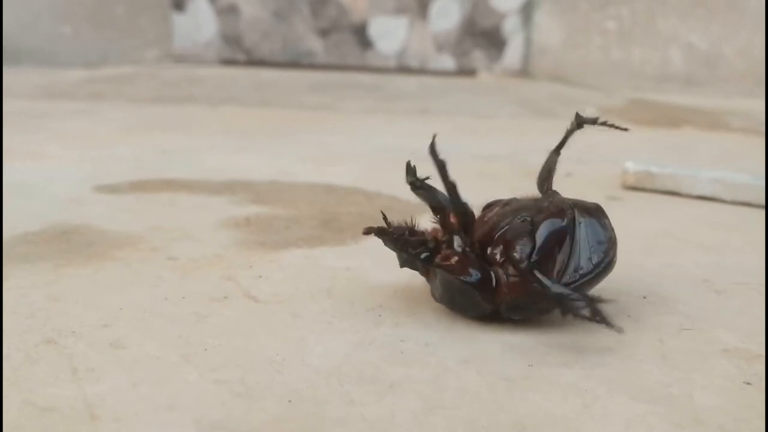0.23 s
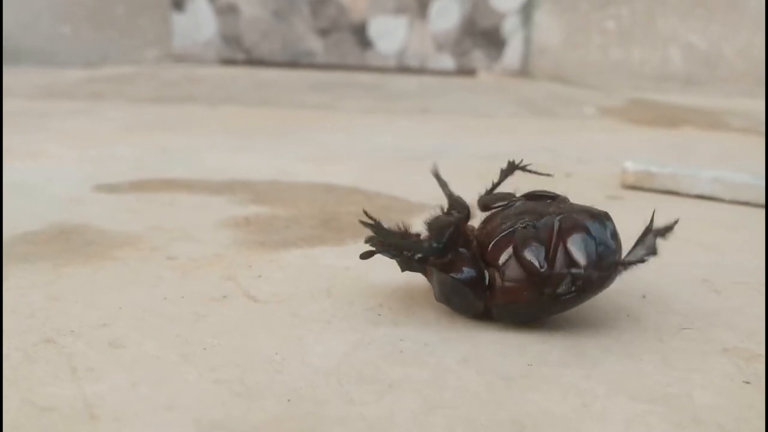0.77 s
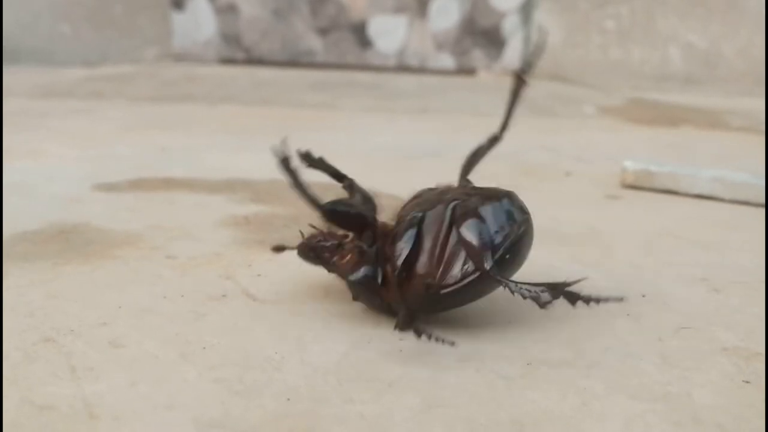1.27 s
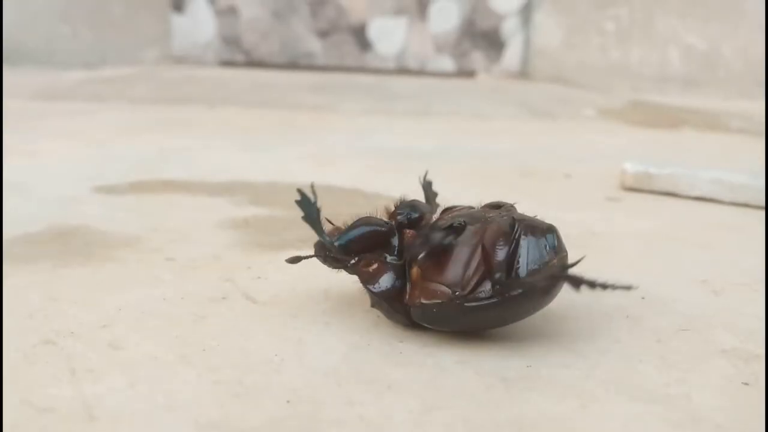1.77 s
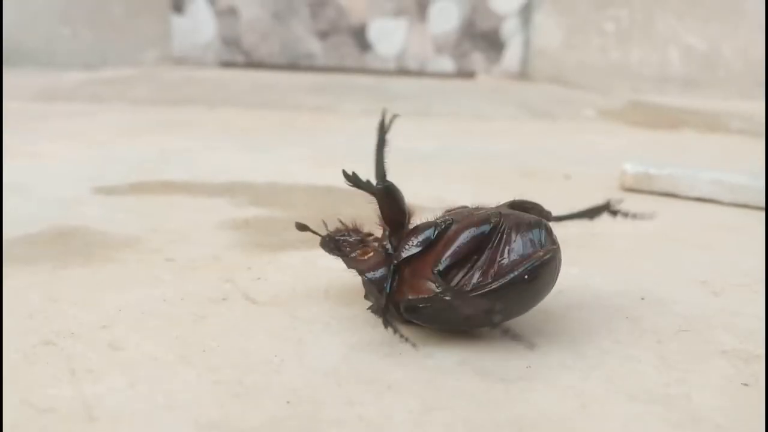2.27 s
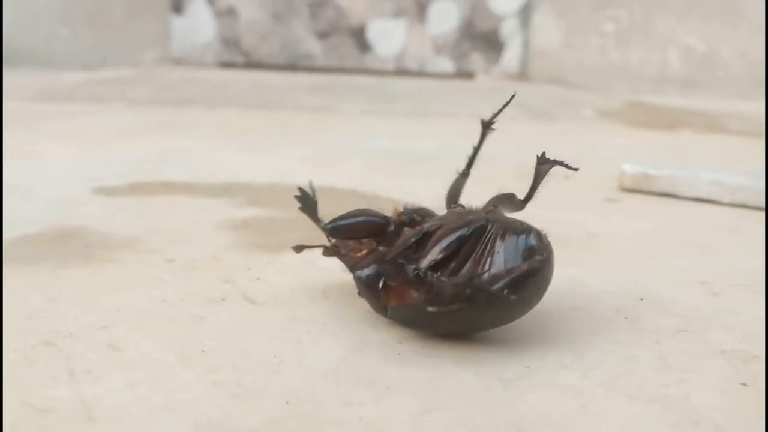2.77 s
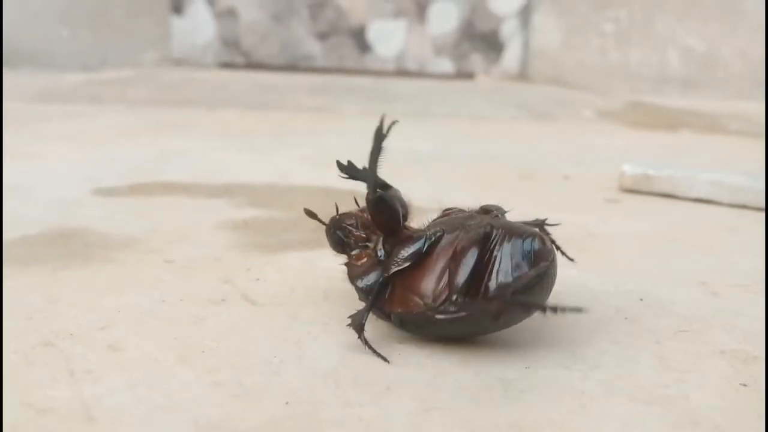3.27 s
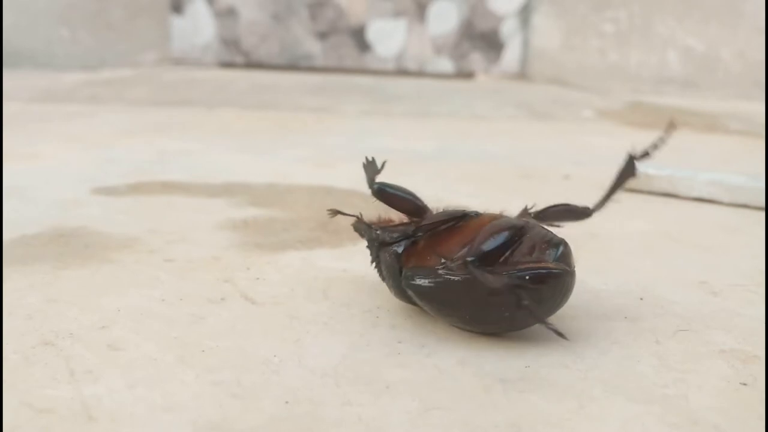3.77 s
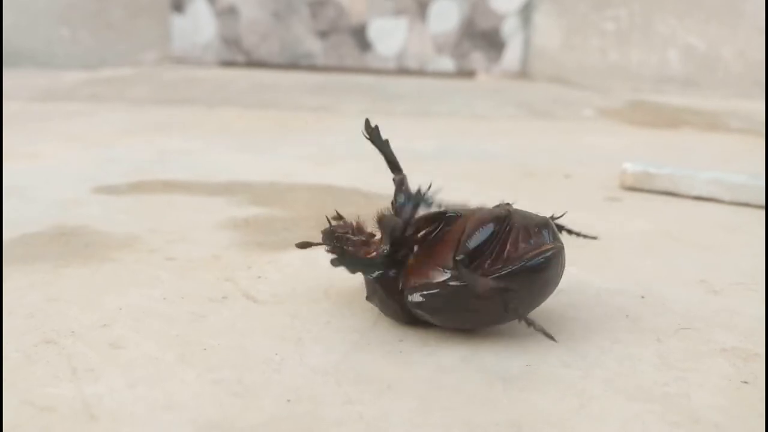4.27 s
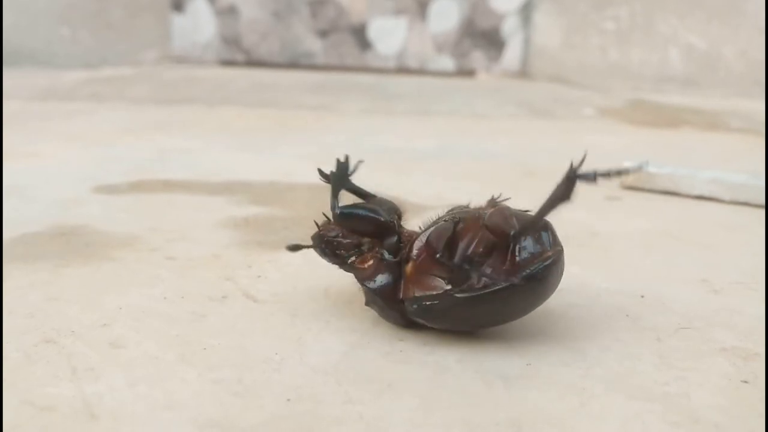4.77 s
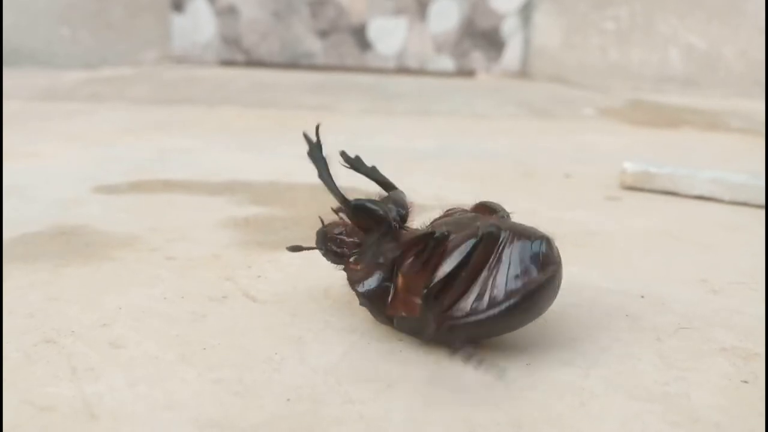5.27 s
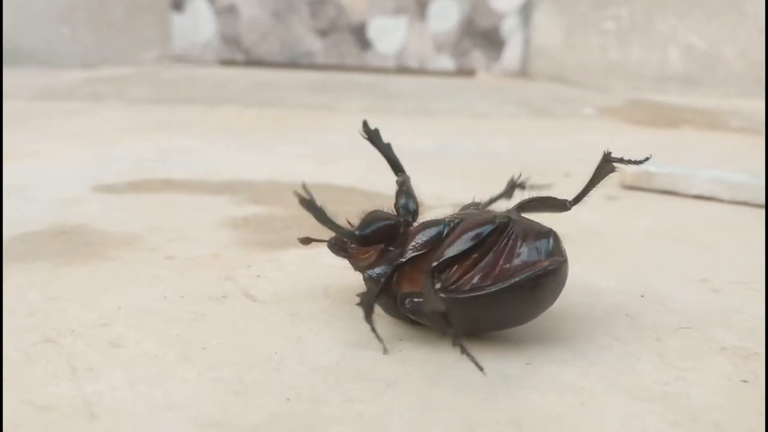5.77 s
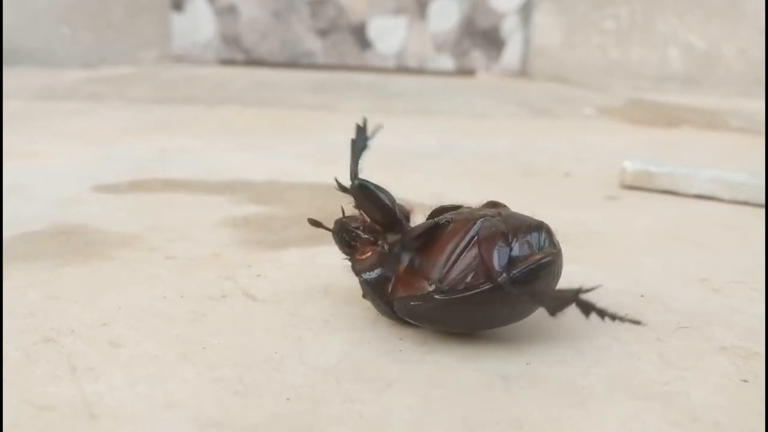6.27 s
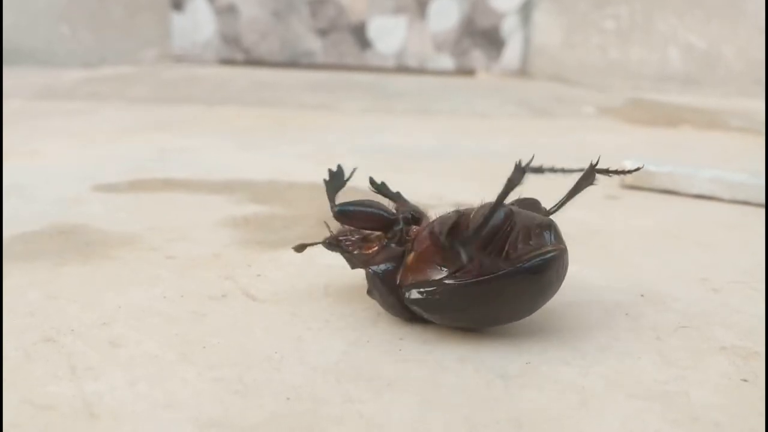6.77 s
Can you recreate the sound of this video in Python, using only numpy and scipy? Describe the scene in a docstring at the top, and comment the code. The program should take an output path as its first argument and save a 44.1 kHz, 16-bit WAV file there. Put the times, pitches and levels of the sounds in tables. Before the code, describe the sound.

A big beetle lying on its back makes a near-continuous dry rasping. It opens with hissy strokes, then alternates grainy, ticking drags with quick zipping sweeps roughly once a second. Early on it rolls slightly and the tone shifts a little. Odd sharp snaps mark changes of stroke; a faint hum and a brief thin squeak barely show. Close stereo pickup, hard floor, very quiet surroundings.

```python
"""A large beetle lies on its back on a stone floor and stridulates, close to a two-port microphone.
A scraper on its abdomen snaps over the teeth of a file: each tooth is a sharp click that rings the shell.
Slow drags tick and rasp, fast sweeps merge into a hiss. It rolls over a little, which changes the colour.
A faint hum and a thin squeak are narrow bands of noise; very quiet shaped noise is the still air."""
import sys
import numpy as np
from scipy import signal
from scipy.fft import rfft, irfft
from scipy.io import wavfile
from scipy.ndimage import map_coordinates

SR = 44100
rng = np.random.default_rng(int(sys.argv[2]) if len(sys.argv) > 2 else 0)


def output_pcm(signal):
    """Save a mono or channel-first signal as 16-bit PCM at the path in sys.argv[1].

    Samples are clipped to [-1, 1] before scaling.
    """
    pcm = np.clip(np.atleast_2d(signal).T, -1, 1) * 32767
    wavfile.write(sys.argv[1], SR, np.round(pcm).astype(np.int16))


N = 310023

# start and end of the body's roll: (t/s, t/s)
ROLL_TIMES = (1.18, 1.4)


def amp(db):
    """Decibels to gain."""
    return 10 ** (np.asarray(db) / 20)


def evened(x):
    """Scales to rms 1."""
    return x / np.sqrt(np.mean(x ** 2) + 1e-20)


def read(freqs, values, hz):
    """Joins spectrum points on a log-frequency axis."""
    return np.interp(np.log(hz + 1), np.log(np.asarray(freqs) + 1), values)


def wander(hz):
    """Smooth random curve of rms 1, moving mostly slower than hz times a second."""
    f = np.fft.rfftfreq(N, 1 / SR)
    smoothed = rfft(rng.standard_normal(N)) / (1 + (f / hz) ** 4)
    return evened(irfft(smoothed, N))


def causal(db, size=2048):
    """Minimum-phase response of energy 1, with its spectrum shaped by the dB per bin."""
    log_gain = np.log(amp(np.r_[db, db[-2:0:-1]]))
    response = np.fft.ifft(np.exp(np.conj(signal.hilbert(log_gain)))).real[:size // 2]
    return response / np.linalg.norm(response)


def contact(t, start, end, grab_db_per_s=4500, release_db_per_s=2200):
    """Level in dB of the scraper's hold on the file: full from start to end, falling away outside."""
    return -grab_db_per_s * np.maximum(start - t, 0) - release_db_per_s * np.maximum(t - end, 0)


def sweep(t, start, end, crest, start_rate, top_rate, end_rate, db, lift_db, bite_db):
    """The scraper presses in up to a crest of speed, then brakes or lifts off; power follows speed and pressure."""
    swell_curve, brake_curve, lift_curve = 2.1, 1.9, 2.74  # powers of the distance from the crest
    swell_db = 9  # the touch at the start is this much lighter
    bite_per_db = 1.04  # pressing harder sharpens the snaps
    u = np.clip((t - start) / (end - start), 0, 1)
    before = np.maximum(1 - u / crest, 0) ** swell_curve
    after = np.maximum((u - crest) / (1 - crest), 0)
    rise = (start_rate - top_rate) * before
    brake = (end_rate - top_rate) * after ** brake_curve
    rate = top_rate + rise + brake
    pressure_db = -swell_db * before - lift_db * after ** lift_curve
    level_db = db + pressure_db + 10 * np.log10(rate / top_rate) + contact(t, start, end)
    return rate, level_db, bite_db + bite_per_db * pressure_db


def drag(t, judder, start, end, rate, speed_up, db, bite_db, edge_speed=0.7):
    """The scraper crawls at even pressure, in a shallow, leaning, juddering arch of speed."""
    u = np.clip((t - start) / (end - start), 0, 1) - .5
    arch = edge_speed ** ((2 * u) ** 2)  # slower at both ends
    speed = arch * 2 ** (speed_up * u) * judder
    level_db = db + 10 * np.log10(speed) + contact(t, start, end)
    return rate * speed, level_db, np.full_like(t, bite_db)


def motion(size=16, judder_db=1.19, judder_hz=20, rest_rate=400, rest_db=-57):
    """Teeth per s, level dB and bite dB through time; where strokes overlap, the stronger has the scraper."""
    # fast strokes that swell into a hiss: (start t/s, end t/s, place of the crest 0-1,
    # rate at start, crest and end/teeth per s, level/dB, lift-off at the end/dB,
    # bite at the crest, treble over bass/dB before the scraper's bite depth)
    sweeps = [(0.0, 0.264, .05, 500, 725, 674, -25.5, 8, 3),
              (0.263, 0.454, 0.47, 710, 1330, 280, -24, 3, 3), (1.03, 1.2, .48, 620, 926, 650, -29, 5, 3.5),
              (1.165, 1.421, .47, 1020, 1320, 870, -26, 5, 0),
              (1.395, 1.604, 0.49, 1016, 1250, 326, -23.5, 0, 2),
              (2.271, 2.624, 0.27, 876, 1520, 383, -26, 0, 0),
              (2.679, 2.928, .42, 1050, 1320, 272, -23, 1, 3),
              (3.655, 3.879, .5, 904, 2850, 2000, -24, 1, 0),
              (3.761, 4.05, .52, 1000, 1200, 290, -22, 0, 2.5),
              (4.617, 5.013, 0.36, 747, 950, 410, -23, 0, 3.5),
              (4.999, 5.141, 0.62, 1054, 1330, 1200, -31, 2, -3),
              (6.001, 6.377, 0.51, 692, 1030, 840, -26, 10, -2),
              (6.386, 6.779, .31, 1000, 1400, 700, -22, 6, 3)]
    # slow strokes that tick and rasp: (start t/s, end t/s, rate before arch, lean and judder/teeth per s,
    # speed-up from start to end/octaves, level before the speed changes/dB, bite/dB before the bite depth)
    drags = [(0.452, 0.511, 187, 0.34, -37.5, 1), (0.516, 0.636, 310, 0.12, -30.5, 2.5),
             (0.6, 0.902, 516, -0.021, -28.5, 3), (0.88, 1.12, 370, -0.019, -29.5, 3),
             (1.608, 1.77, 380, 0.85, -31.5, -1), (1.765, 1.855, 256, -0.58, -31.5, 0.5),
             (1.849, 2.19, 650, 0.04, -27.6, 1), (2.15, 2.36, 450, 0.33, -28.5, 1),
             (2.931, 2.999, 282, 1.14, -32.5, 2.5), (2.984, 3.131, 440, -0.26, -28, 0.04),
             (3.099, 3.441, 606, 0.082, -26.5, 1), (3.399, 3.636, 545, -0.32, -27.5, 1),
             (3.62, 3.68, 1160, -.4, -34, -7.5), (4.05, 4.107, 187, -0.34, -35.5, 3),
             (4.112, 4.213, 624, -.2, -25, 2), (4.201, 4.274, 650, -0.25, -27.5, 0.5),
             (4.308, 4.318, 320, 0.53, -42.5, 2), (4.318, 4.501, 580, -.1, -28.5, -0.2),
             (4.459, 4.687, 760, 0.092, -27.5, -1.5), (5.15, 5.243, 440, -0.38, -29, 1.1),
             (5.249, 5.3, 210, 0.81, -31.5, 4.5), (5.294, 5.435, 567, 0.14, -26.5, 1.2),
             (5.44, 5.7, 377, -0.12, -27, 3.5), (5.671, 5.838, 460, -0.26, -26.3, 1.5),
             (5.819, 6.041, 714, -.5, -26.5, 0.45), (6.03, 6.16, 410, .8, -29, 2.5),
             (6.781, 6.903, 407, -0.15, -27.5, 0.5), (6.902, 6.937, 150, -0.46, -34, 3),
             (6.948, 6.98, 210, .4, -30, 5.5), (6.983, 7.029, 392, -0.47, -27.5, 3)]
    t = np.arange(0, N, size) / SR
    judder = amp(judder_db * wander(judder_hz)[::size])
    # between strokes the scraper barely touches the file: very faint ticking
    rest = np.outer([rest_rate, rest_db, 0], np.ones_like(t))
    fast = [sweep(t, *row) for row in sweeps]
    slow = [drag(t, judder, *row) for row in drags]
    strokes = np.array([rest] + fast + slow)
    strongest = strokes[strokes[:, 1].argmax(axis=0), :, np.arange(len(t))]
    return [np.interp(np.arange(N) / SR, t, control) for control in strongest.T]


def teeth(rate, db, slow_jitter=.24, fast_jitter=.14, racing_jitter=0.36, uneven_db=3, grip_db=0.75,
          rebound_db=-11, rebound_s=0.00037):
    """A snap per tooth, then a weak rebound; timing is evener in fast strokes, uneven at the fastest rates."""
    travel = np.cumsum(rate) / SR  # in teeth
    tooth = np.arange(int(travel[-1]))
    spacing, size, late, bounce = rng.standard_normal((len(tooth), 4)).T
    tooth_rate = np.interp(tooth, travel, rate)
    jitter = np.interp(tooth_rate, [400, 1300, 3000], [slow_jitter, fast_jitter, racing_jitter])
    slip = signal.lfilter([1], [1, -.9], jitter * spacing)  # each slip carries over to the next teeth
    at = np.searchsorted(travel, tooth + slip).clip(0, N - 1)
    # the scraper lets go at a nearly fixed force: snaps may be weak, but are never much too strong
    snap = evened(amp(-uneven_db * abs(size) ** 1.31))
    # the root keeps the power at the stroke's level, however dense the teeth
    grip = amp(db + grip_db * wander(17)) * np.sqrt(SR / rate)
    force = snap * grip[at]
    again = at + (SR * rebound_s * np.exp(late / 2)).astype(int)
    rebounds = np.bincount(again, amp(rebound_db) * force * bounce, N)[:N]
    return np.bincount(at, force, N) + rebounds


def chatter(db, per_s=900, size_db=4, level_db=-18):
    """Tiny slips between the teeth: random impulses that follow the level of the strokes."""
    sizes = amp(size_db * rng.standard_normal(N).clip(-2, 1))
    slips = (rng.random(N) < per_s / SR) * sizes
    return evened(slips) * amp(level_db + db)


def scraper(bite_depth=1.66, split_hz=5800, catch_db=7):
    """All the snaps on the file; sharper ones carry more treble at the expense of bass."""
    # single hard snaps where the scraper catches at the turn of a stroke: (t/s, level before catch_db/dB)
    catches = [(0.5157, -13), (1.6043, -25), (2.6798, -14), (4.049, -17.5), (4.1125, -16), (4.3185, -27),
               (5.1477, -11), (6.9168, -12), (6.9472, -15)]
    s, peak_db = np.transpose(catches)
    rate, db, bite_db = motion()
    hard_snaps = np.bincount((s * SR).astype(int), amp(peak_db + catch_db), N)
    x = teeth(rate, db) + chatter(db) + hard_snaps
    bass = signal.sosfiltfilt(signal.butter(2, split_hz, fs=SR, output="sos"), x)
    treble = x - bass
    tilt = amp(bite_depth * bite_db / 2)
    return (bass / tilt + treble * tilt) / np.sqrt((tilt ** 2 + tilt ** -2) / 2)


def floor_echo(x, first_s=0.000454, last_s=0.000638, echo_db=-10):
    """While the body rolls, its echo off the floor lengthens and a comb slides down through the rasp."""
    n = np.arange(N)
    rolled = np.interp(n / SR, ROLL_TIMES, [0, 1])
    delay = SR * (first_s + rolled * (last_s - first_s))
    gain = amp(echo_db) * np.sin(np.pi * rolled)  # strongest halfway through the roll
    echo = map_coordinates(x, [n - delay], order=3)
    return (x + gain * echo) / np.sqrt(1 + gain ** 2)


def leg_echoes(x, echo_db=-18, sway_s=0.000207, sway_hz=1.55, count=3):
    """Weak early echoes whose paths sway as the beetle rocks and flails."""
    n = np.arange(N)
    paths = [SR * (s + sway_s * wander(sway_hz)) for s in np.geomspace(.002, .007, count)]
    # the echoes alternate in sign
    echoes = sum((-1) ** k * map_coordinates(x, [n - path], order=3) for k, path in enumerate(paths))
    return (x + amp(echo_db) * echoes) / np.sqrt(1 + count * amp(echo_db) ** 2)


def surroundings(x, left_wet_db=-9, right_wet_db=-4, t60=0.03, far_db=-20, far_t60=0.077):
    """Legs, floor and walls scatter each click into a short diffuse tail, unrelated at the two ports."""
    t = np.arange(SR // 5) / SR
    near = amp(-60 * t / t60) ** 2
    far = amp(far_db - 60 * t / far_t60) ** 2
    decay = (near + far) * (t > .0005)
    energy = abs(signal.oaconvolve(x ** 2, decay / decay.sum())[:N])
    tail = np.sqrt(energy) * rng.standard_normal((2, N))
    return x + amp([[left_wet_db], [right_wet_db]]) * tail


def far_port(x, gain_db, lead_ms, size=2048):
    """Sound bends round the housing and reaches the right port late and ringing."""
    # resonances of the path: (f/Hz, width/Hz, level before gain_db/dB, lag before lead_ms is taken off/ms)
    port_modes = [(1014, 1157, 13, 0.5973), (1439, 940, 13, 0.3663), (2580, 900, -22, 0.022),
                  (4020, 2400, 5, 0.07), (4645, 3400, 1.5, 0.2053), (5870, 860, -3.5, 0.15),
                  (6566, 1860, -2.5, 0.18), (8135, 1020, 6, 0.2698), (9920, 2670, 10, 0.2536),
                  (10415, 1560, 15.5, 0.2182), (11170, 430, 5, 0.191), (13600, 2300, 3.5, 0.2015)]
    hz = np.fft.rfftfreq(size, 1 / SR)
    path = 0
    for f, width, db, lag in port_modes:
        delay = np.exp(-2j * np.pi * hz * (lag - lead_ms) / 1000)
        path = path + amp(db) * delay / (1 + 2j * (hz - f) / width) ** 2
    return signal.oaconvolve(x, irfft(amp(gain_db) * path)[:size // 4])[:N]


def beetle(before_db=-3, after_db=-0.3, right_db=-2.35, size=2048):
    """Tooth impulses ring the shell, which crossfades between two postures as the body rolls."""
    # relative colour of the shell's click: (f/Hz, before the roll/dB, after the roll/dB,
    # extra beamed to the right before the roll/dB)
    shell = [(202.4, -38, -47, 6.5), (600, -47, -46.5, 4), (1256, -24.5, -26, 2.5), (1570, -16, -21, 3),
             (2277, -7, -12.5, 2), (3340, -4, -7.5, 1), (4470, 0.5, -2, -0.5), (6200, -0.7, 0.5, 5.5),
             (7330, 1.5, -1, 5.5), (8250, -10.5, -6, 5), (9705, -5, -10.5, 6), (11750, -16.5, -24.5, -7.5),
             (15100, -21, -28.5, 3)]
    hz = np.fft.rfftfreq(size, 1 / SR)
    freqs, before, after, beam = np.transpose(shell)
    rolled = np.interp(np.arange(N) / SR, ROLL_TIMES, [0, np.pi / 2])
    clicks = surroundings(leg_echoes(floor_echo(scraper())))
    before_ring = causal(read(freqs, before, hz))[None]
    after_ring = causal(read(freqs, after, hz))[None]
    early = signal.oaconvolve(clicks * np.cos(rolled) ** 2, before_ring, axes=1)[:, :N]
    late = signal.oaconvolve(clicks * np.sin(rolled) ** 2, after_ring, axes=1)[:, :N]
    early_right = far_port(early[1], right_db + read(freqs, beam, hz), lead_ms=0.052)
    late_right = far_port(late[1], right_db, lead_ms=0)
    early = np.array([early[0], early_right])
    late = np.array([late[0], late_right])
    return amp(before_db) * early + amp(after_db) * late


def air(level_db=-58, opposed=0.39, swell_db=1.6, swell_hz=5):
    """Still air: very quiet, gently uneven shaped noise, partly opposite in sign at the two ports."""
    # relative colour of the noise: (f/Hz, level/dB)
    air_colour = [(20, 6.5), (45, -3), (75, 4.5), (150, -1.5), (250, -13), (400, -5.5), (800, -9.5),
                  (2000, -2), (6000, -8), (15000, -32)]
    colour = amp(read(*np.transpose(air_colour), np.fft.rfftfreq(N, 1 / SR)))
    a, b = irfft(rfft(rng.standard_normal((2, N))) * colour, N)
    right = np.sqrt(1 - opposed ** 2) * b - opposed * a
    return amp(level_db + swell_db * wander(swell_hz)) * evened(np.array([a, right]))


def whistle(rows, width_hz, left_db, fade_db_per_s):
    """Fuzzy narrow bands that fade in, hold and fade out: tones multiplied by slow complex noise."""
    t = np.arange(N) / SR
    fuzz = wander(width_hz) + 1j * wander(width_hz)
    tones = 0
    for start, end, hz, db in rows:
        fade_db = fade_db_per_s * abs(t - np.clip(t, start, end))
        tones = tones + amp(db - fade_db) * np.exp(2j * np.pi * hz * t)
    return amp([[left_db], [0]]) * (tones * fuzz).real


def faint_hum():
    """A faint hum of narrow bands, some at about the tooth rate; slow to fade, stronger on the right."""
    # (hold start t/s, hold end t/s, f/Hz, level on the right/dB)
    hum_bands = [(0.35, 0.65, 1678, -52.5), (3.16, 3.55, 1080, -57), (4.58, 4.85, 721.5, -67),
                 (6.5, 6.68, 1099, -58.5), (6.72, 7.0, 723.7, -67)]
    return whistle(hum_bands, width_hz=63, left_db=-10.5, fade_db_per_s=126)


def thin_squeak():
    """A thin high band in two of the pauses, quick to fade and nearly even left to right."""
    # (hold start t/s, hold end t/s, f/Hz, level on the right/dB)
    squeak_bands = [(2.625, 2.665, 5340, -53), (4.065, 4.1, 5404, -60)]
    return whistle(squeak_bands, width_hz=220, left_db=1.0, fade_db_per_s=1000)


def scene():
    """The beetle, with a faint hum and a thin squeak, over still air."""
    return beetle() + air() + faint_hum() + thin_squeak()


def record(dry, edge_hz=15700):
    """The band limit: a steep linear-phase low-pass removes the top treble."""
    lowpass = signal.firwin(301, edge_hz, window=("kaiser", 9), fs=SR)
    return signal.oaconvolve(dry, lowpass[None], "same", axes=1)


dry = scene()
out = record(dry)
output_pcm(out)
```